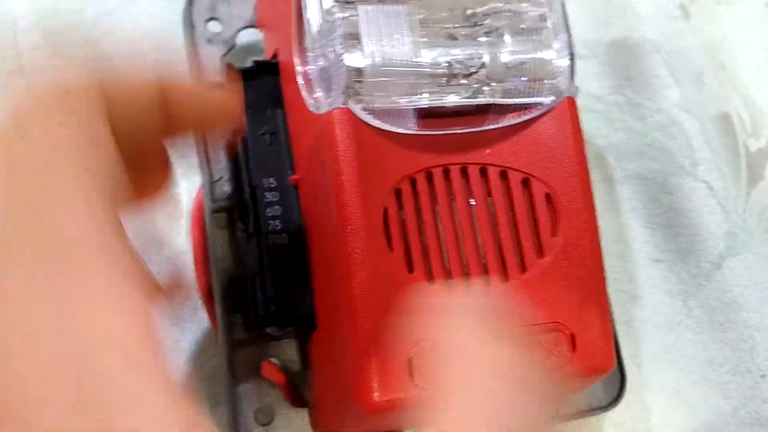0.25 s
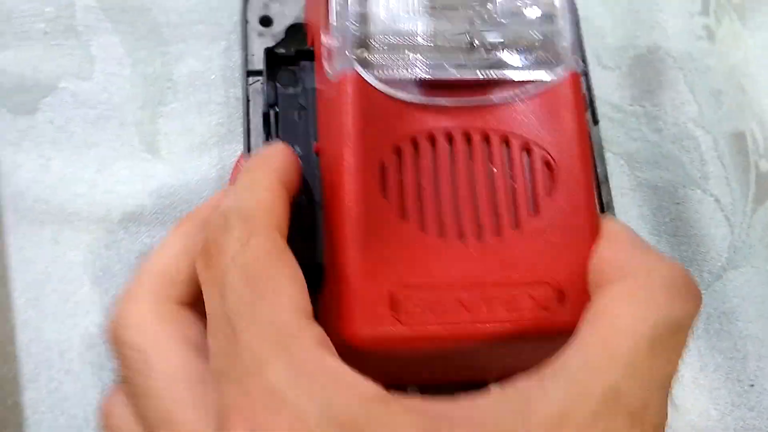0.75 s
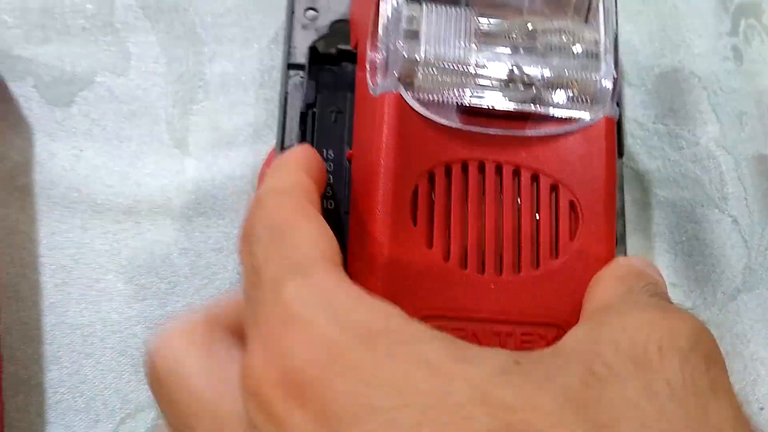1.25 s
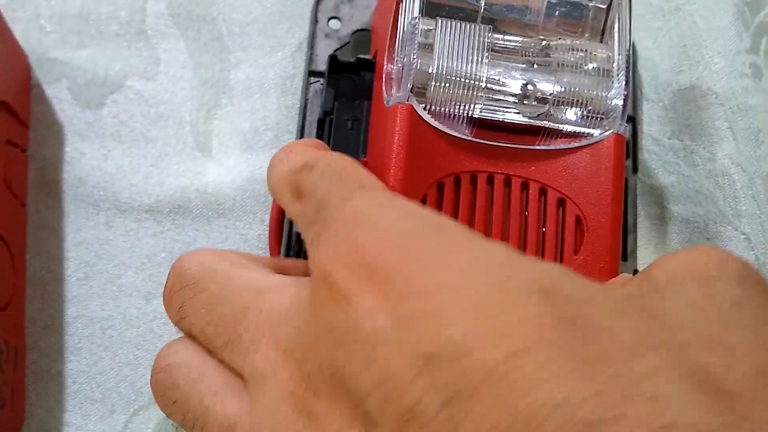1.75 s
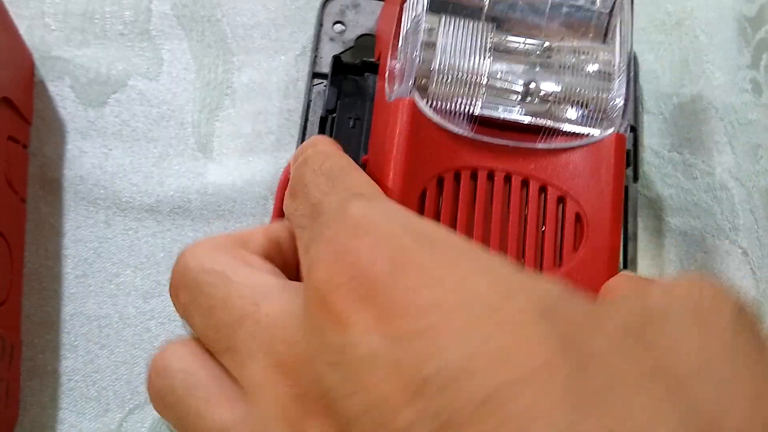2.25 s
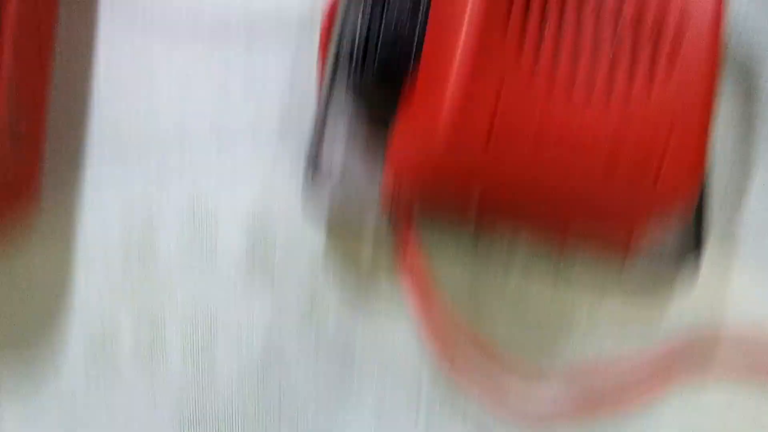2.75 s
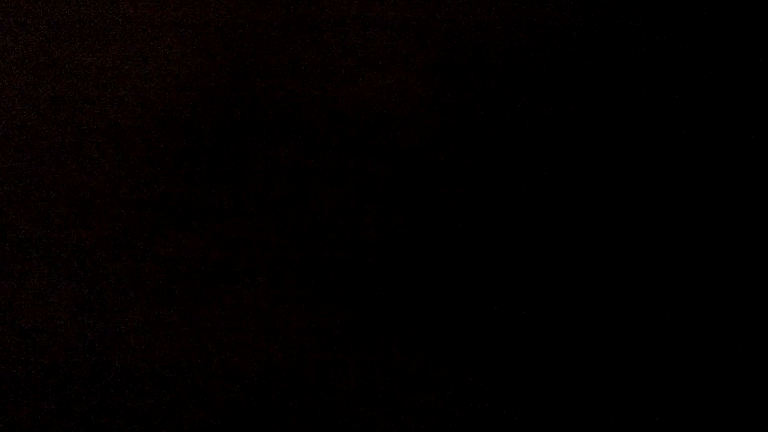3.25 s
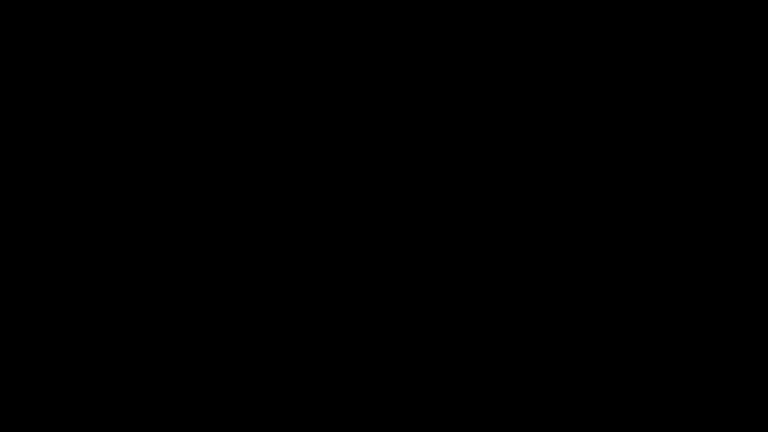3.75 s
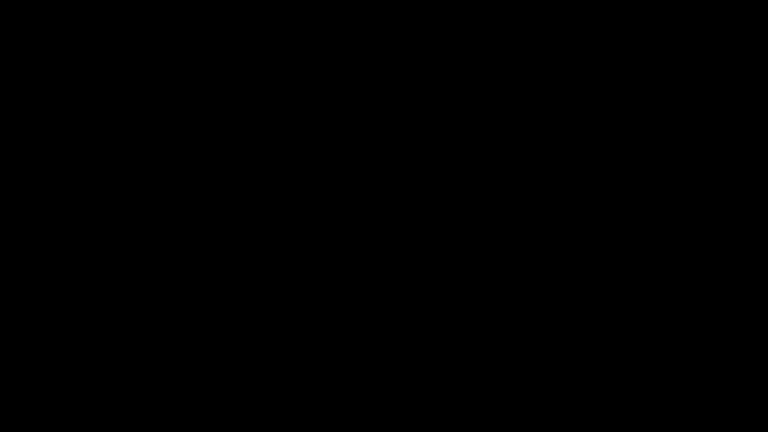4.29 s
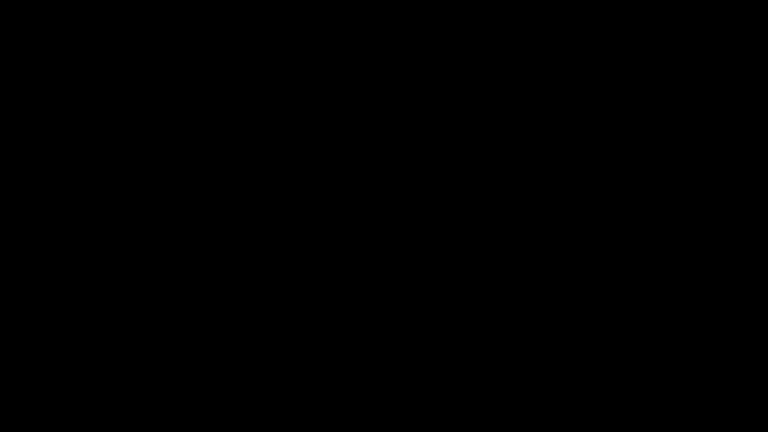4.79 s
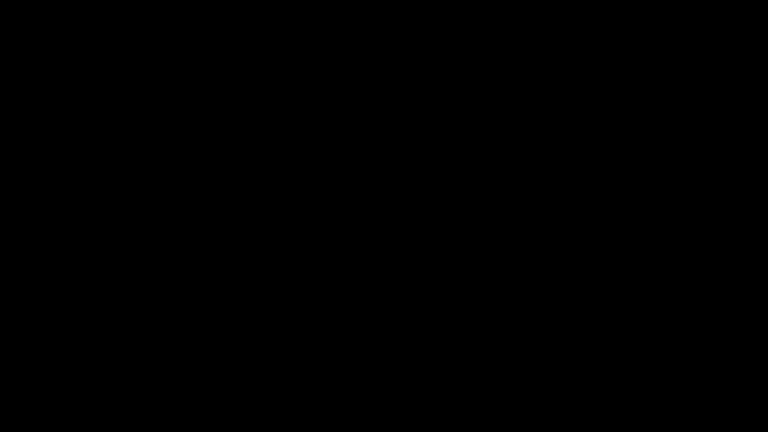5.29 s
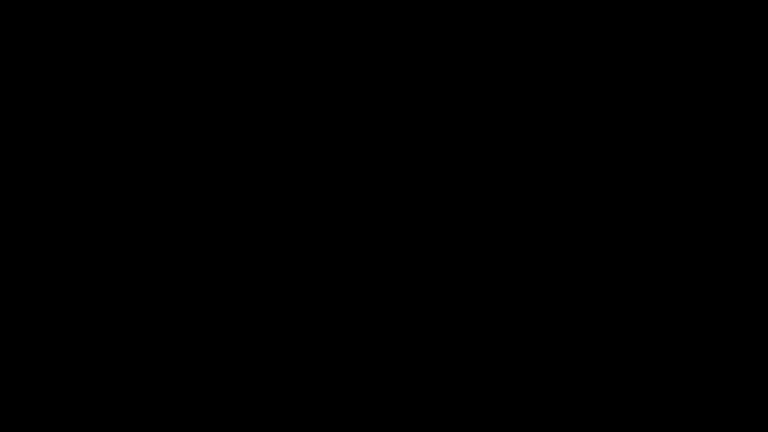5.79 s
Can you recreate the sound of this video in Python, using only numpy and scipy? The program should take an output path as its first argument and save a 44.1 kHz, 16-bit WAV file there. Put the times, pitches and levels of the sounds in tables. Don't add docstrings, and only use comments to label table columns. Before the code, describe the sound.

A close, dry stereo pickup in a quiet room with low noise and faint mains hum. From 0 to 1.9 s, fingers rub a hollow plastic housing with soft hiss, small irregular slider clicks, a faint creak around 1 s and occasional dull low bumps. A firmer hollow click comes at 2.0 s. From 2.3 s the microphone is gripped and turned: low thumps crowd the right side, with gritty catches, stronger clicks at 2.5 s and bright snaps near 2.85 s. At 3.23 s it lands with a very loud, boomy knock, and again at 3.41 s, with scraping between and a low buzz fading by 3.6 s. Then it calms: a thin low whine, light cloth drags, clicks around 3.75-4.3 s, a strong click at 4.63 s, sparse ticks near 5.4 s, and a scratchy click and hissy rub at 6.0 s.

```python
import sys
import numpy as np
from scipy import signal
from scipy.fft import rfft, irfft, next_fast_len
from scipy.io import wavfile
from scipy.ndimage import uniform_filter1d

SR = 44100
rng = np.random.default_rng(int(sys.argv[2]) if len(sys.argv) > 2 else 0)


def put_to_file(sound):
    columns = np.atleast_2d(sound).T
    safe = np.clip(columns, -1, 1)
    whole_steps = np.round(safe * 32767)
    wavfile.write(sys.argv[1], SR, whole_steps.astype(np.int16))


def undo_db(level):
    steps = np.asarray(level, float) / 20
    return 10 ** steps


N = 265834

# time in seconds, body level in dB, lean in dB, crack level in dB, body
# pitch in Hz.
SLIDER_CLICKS = [(0.0153, -56, -4, -79, 1010), (0.054, -50, 36, -65.5, 815), (0.5313, -54.5, 19, -81, 920),
                 (0.8316, -47.5, -6, -96, 650), (0.858, -56.5, 7, -67, 670), (0.9206, -58, 10, -61.5, 920),
                 (1.1325, -43, 9, -53, 950), (1.169, -46, 7, -83, 840), (1.2916, -49.5, 30, -62.5, 805),
                 (1.64, -63.5, 22, -94, 920), (1.815, -54, 15, -80, 833), (1.9418, -45.5, 12, -58, 1250),
                 (1.985, -36, 5, -47.5, 1063), (2.4785, -34.5, -5, -53, 935), (2.4941, -39, 25, -46, 1030),
                 (2.5053, -29, -15, -93, 870), (2.8138, -53, -27, -57, 1340),
                 (2.8532, -36, -24, -28.5, 1410), (2.9302, -49.5, -12, -48.5, 415),
                 (3.0675, -62.5, 6, -47, 1970), (3.2398, -33.5, -0.5, -45, 1295),
                 (3.742, -50, 20, -58.5, 1080), (3.76, -49, -2, -70, 1070), (3.8203, -46, 0, -47.5, 1420),
               (3.88, -35.5, 2, -58, 1205), (3.887, -39, 9.5, -62, 1390), (3.986, -58, -1, -73, 1720),
               (4.053, -52.5, 3, -77.5, 1510), (4.0845, -49, 9, -79.5, 630), (4.177, -49, -6, -58, 620),
               (4.273, -61, -2.5, -92, 1060), (4.634, -24, 1, -37.5, 1080), (4.6449, -36.5, -19, -48, 1350),
               (4.7647, -54.5, 8, -66.5, 1220), (4.8432, -57.5, 5, -60.5, 1330),
               (5.2658, -52.5, -8.5, -72, 487), (5.413, -43, -14, -43, 2029), (5.4162, -46, -15, -69, 1150),
               (5.4455, -56, -8, -103, 780), (5.6058, -58, -6, -66.5, 472), (5.6722, -59, 6.5, -59, 1100),
               (5.6835, -54, -18, -68, 1150), (5.838, -52, -14, -63, 1166), (5.8997, -58.5, -14, -96, 984),
               (6.0208, -35.5, 36, -37.5, 1150),
                 (0.066, -55, 12, -80, 1000), (0.191, -58.5, 11, -77, 800), (0.197, -57, -9, -78, 1190),
               (0.214, -60.5, 1, -78, 1410), (0.264, -66, -2, -82, 950), (1.157, -52.5, -1, -76, 1000),
               (1.237, -58.5, 0, -77, 1120), (1.95, -48, 8, -70, 885), (1.976, -47, 2, -56, 900),
               (1.988, -40.5, 2.5, -64, 314), (2.484, -37, 8, -62, 990), (2.514, -40, 3, -53, 1110),
               (2.8495, -42.5, -27, -49, 1090), (3.7395, -54.5, -10, -64, 353), (3.848, -73, 5, -72, 1200),
               (3.8755, -45, 18, -66, 1100), (4.6358, -33, -0.5, -35, 592), (3.356, -46, -24, -65, 1420),
               (1.8155, -56.5, 10, -87, 1020)]
# time in seconds, level in dB, pitch in Hz.
CASE_TICKS = [(0.6351, -55, 410), (0.7042, -61.5, 424), (0.769, -64, 950), (1.106, -50.5, 396),
              (1.2025, -55.5, 422), (2.2055, -57, 424), (2.3072, -55, 820), (2.3312, -52, 587),
              (2.3383, -59, 444), (2.403, -40, 520), (2.7047, -57.5, 450), (2.761, -47, 594),
              (3.369, -41, 1310), (6.0008, -41.5, 800)]
TICK_LEAN_DB, TICK_CRACK_DB = -34, -30
# pitch in Hz, width in Hz, level in dB.
HOUSING = [(620, 170, 0), (870, 188, 2.5), (1150, 340, -3.5), (1685, 130, -13.5), (2235, 84, -5.5)]
# frequency in Hz, level in dB per Hz.
CRACK = [(1800, 12.5), (3000, 9), (6000, 0.5), (12000, -6), (16000, 0)]
CRACK_HZ, LATE_CRACK_HZ = 4400, 3380
CRACK_LAG_S = .0018
NEAR_LEAN_DB, NEAR_CRACK_DB, NEAR_CRACK_HZ, NEAR_CRACK_GAIN = -22, -40, 12500, 7.5
PANEL_HZ, PANEL_WIDTH_HZ, PANEL_GAIN = 3030, 110, 2.5
# time in seconds, length in seconds,
# level in dB, lean in dB, centre in Hz.
RATTLES = [(1.121, 0.0033, -74, 6, 6000), (1.13, 0.0035, -57, 7, 5000), (1.129, .003, -61, 6, 14500),
           (2.8533, 0.0013, -23.5, -10, 13500), (4.633, 0.0048, -41.5, 2, 5503),
           (4.6336, 0.0027, -41, 3, 13500), (5.4125, 0.0031, -49.5, -1, 12000),
           (6.018, 0.01, -46.5, -5, 4500)]

# start in
# seconds, end in seconds, body level in dB, lean in dB, hiss level in dB.
FINGER_RUBS = [(0, 0.13, -71, 9, -81), (0.19, 0.26, -64, -9, -70), (0.526, 0.66, -73.5, 4, -94),
               (0.833, 0.848, -60, 2, -73.5), (0.864, 0.9, -68, 3, -73.5), (0.924, 0.93, -57.5, 8, -63.5),
               (.96, 1.044, -72, 7, -79.5), (1.112, 1.14, -58.5, -11, -70), (1.15, 1.315, -68.5, -2.5, -80),
               (1.311, 1.326, -58.5, 1, -66), (1.828, 1.85, -63.5, 8, -83), (1.948, 1.932, -53, 15, -59),
               (1.987, 1.973, -37.5, -1, -46), (2.321, 2.38, -63.5, -13, -68),
               (2.399, 2.424, -50, 1.5, -55.5), (2.432, 2.536, -53, -17, -73), (2.481, 2.498, -41, 8, -50),
               (2.516, 2.517, -41.5, 1.5, -47.5), (2.577, 2.623, -56, -23, -72),
               (2.68, 2.68, -64.5, -11, -89), (2.777, 2.845, -43, -28, -63)]
CLOTH_DRAGS = [(2.811, 2.84, -57, -31, -46.5), (2.89, 2.91, -71, -14, -71), (3.233, 3.28, -43.5, -25, -48),
               (3.281, 3.345, -57.5, -28, -62.5), (3.36, 3.381, -47.5, -25, -44),
               (3.394, 3.48, -51, -21, -46.5), (3.425, 3.36, -59, -19, -72), (3.521, 3.56, -72.5, 4, -74.5),
               (3.737, 3.79, -63, 7, -66.5), (3.758, 3.69, -45, 11, -55), (3.826, 3.95, -58, -15, -72.5),
               (3.885, 3.906, -59, 20, -62), (4.034, 4.09, -56, -4.5, -74.5), (4.14, 4.37, -64, -7, -76.5),
               (4.371, 4.41, -59, -1.5, -70.5), (4.432, 4.52, -60, -4.5, -71.5),
               (4.637, 4.654, -50, 0.5, -58), (4.68, 4.714, -60.5, -1.5, -70),
               (4.75, 4.942, -67, -7, -78.5), (4.973, 5.03, -62.5, 14, -64), (5.004, 5.22, -65, 8, -81),
               (5.218, 5.6, -69.5, 0.5, -81.5), (5.551, 5.56, -59, -14, -67.5), (5.6, 5.55, -68, -3, -76),
               (5.976, 6.12, -53.5, 20, -63.5), (6.02, 6.26, -43, -11, -36)]
# frequency in Hz, level in dB per Hz.
HISS = [(1800, 10), (2700, 3), (4000, -1.5), (6500, -10.5), (10000, -18.5), (15000, -5)]
CLOTH = [(280, 17), (450, 6), (1200, -7.5), (1800, -16.5), (2400, -19), (2600, -39)]
CLOTH_HISS = [(1800, 9), (2700, 4), (4000, -2), (6500, -7), (9000, -15.5), (12500, -7), (15000, -11.5)]
RISE_DB_PER_S, FALL_DB_PER_S, HISS_LEAN_DB = 900, 605.5, 6
STOP_DB_PER_S = 1500
HISS_TOP_HZ = 15550
TURNED_S = 2.6
LANDINGS_S = [
    3.239,
    3.417,
]
# start in seconds, end in seconds, level in dB, pitch in Hz.
CREAKS = [
    (.92, 1.095, -68, 870),
    (3.697, 3.722, -70, 1120),
    (3.801, 3.815, -64, 1140),
]
SINGS = [(3.736, 3.81, -84, 5400), (3.821, 3.853, -72, 3100), (3.821, 3.856, -80, 5700),
         (3.876, 3.894, -62.5, 2980), (4.636, 4.646, -53, 2930), (5.4135, 5.42, -62, 3280),
         (6.001, 6.016, -47.5, 1000), (5.4135, 5.42, -50.5, 1290)]
# time in seconds, level in dB, pitch in Hz.
FINGER_GRIT = [(2.395, -46, 980), (2.4025, -36, 870), (2.43, -42, 850), (2.436, -46, 900),
               (2.4415, -45, 1200), (2.4525, -51, 990), (2.4855, -30.5, 1050), (2.5195, -38, 1200),
               (2.5265, -43, 1300), (2.5315, -43, 1100), (2.539, -46, 900), (2.596, -51, 780),
               (2.615, -57, 1090)]
LIFT_GRIT = [(2.765, -44, 611), (2.779, -40, 657), (2.7865, -40, 1110), (2.794, -42, 1500),
             (2.803, -41.5, 1400), (2.82, -41, 1290), (2.828, -45, 1200)]
SLIDE_GRIT = [(3.356, -44, 1500), (3.3612, -38, 1900), (3.366, -36, 1100), (3.3705, -31.5, 1470),
              (3.3745, -31, 2000), (3.379, -36, 1810), (3.381, -41, 1200), (3.4045, -40, 2000)]
SETTLE_GRIT = [(3.752, -44, 302), (3.76, -40, 360), (3.7605, -57, 3000), (3.772, -47.5, 910),
               (3.778, -51, 400), (3.8765, -42, 1200), (3.89, -40, 1290)]
LAST_GRIT = [(6.001, -36, 910), (6.0123, -42, 1100), (6.017, -39, 705), (6.0235, -37.5, 1150),
             (6.0265, -38, 1080)]
GRIT_WIDTH, RING_WIDTH = .22, 0.27

# time in seconds, right level in dB, pitch in Hz.
GRIP_BUMPS = [(2.318, -23.5, 102), (2.335, -16, 105.5), (2.356, -18, 95), (2.386, -18.5, 117),
              (2.408, -11.5, 125), (2.445, -23.5, 102), (2.463, -16.5, 93), (2.551, -31.5, 95.6),
              (2.598, -21.5, 126), (2.625, -31.5, 114), (2.712, -33, 163), (2.746, -35, 120),
              (2.773, -29, 196), (2.785, -21, 191), (2.798, -20.5, 156), (2.807, -15, 113),
              (2.857, -25.5, 183), (2.934, -33.5, 189), (3.07, -44.5, 214)]
LONE_BUMPS = [(0.12, -34, 91), (0.365, -40, 98), (0.631, -47, 97), (0.66, -49, 103), (0.87, -51, 150),
              (1.119, -29.5, 84.6), (1.146, -39.5, 154), (1.164, -35.5, 87), (1.314, -49, 85.6),
              (3.276, -26, 122), (3.375, -19.5, 90), (3.399, -39, 163), (3.452, -21.5, 87),
              (3.494, -34.5, 93.7), (3.531, -35.5, 94.3), (3.58, -45, 93.6), (3.743, -30, 196),
              (3.762, -45, 210), (3.825, -45, 155), (4.517, -50, 113.7), (4.643, -29.5, 146),
              (4.664, -38.5, 135), (4.697, -47, 115.1), (4.777, -45, 142)]
HOUSING_BUMPS = [(1.99, -39.5, 176), (2.478, -24, 225), (2.493, -24, 185), (2.506, -29.5, 115),
                 (2.533, -31, 120), (6.004, -46, 190)]
BUMP_BASE_S, BUMP_CYCLES = 0.0034, 1.06
FAR_PORT_DB, FAR_PORT_FOLLOWS, HOUSING_LEFT_DB = -41.5, 0.47, -3.5
# time in seconds,
# contact level in dB, contact length in seconds, rocking level in dB, rocking pitch in Hz.
KNOCKS = [(3.2285, -15, .005, -40, 200), (3.2326, -1.5, .004, -6, 125), (3.2405, -1.5, .0013, -3, 430),
          (3.243, -12, .0013, -40, 200), (3.2438, -10, .0034, -40, 200), (3.2462, -12, .003, -7, 88),
          (3.2486, -16, .003, -40, 200), (3.258, -10, .005, -10, 122), (3.411, -8, .0032, -40, 200),
          (3.4128, -11, .004, -40, 200), (3.4154, -5, .0019, -40, 200), (3.4168, -15, .0011, 0, 83),
          (3.4176, -9, .005, -40, 200), (3.4218, -11, .0028, -40, 200)]
KNOCK_DIRECTIONS = [1, -1, -1, -1, -1, 1, 1, 1, -1, -1, -1, 1, 1, -1]
KNOCK_LEFT_DB, ROCKING_CYCLES = -27, 5.5
# time in seconds, level in dB, pitch in Hz.
CASE_RINGS = [(3.2352, -26.5, 1052), (3.2412, -21, 1502), (3.2445, -37, 1200), (3.258, -44.5, 898),
              (3.4112, -35, 1000), (3.4168, -26.5, 744), (3.4222, -42, 805), (3.4335, -47, 1900)]
# time in seconds, level in dB, contact in seconds.
SNAGS = [(2.3075, -36, 0.00086), (2.3326, -25.5, 0.0014), (2.3399, -33.5, 0.0011), (2.351, -34, .0012),
         (2.3735, -41, 0.00054), (2.3805, -40, .001), (2.4026, -21.5, 0.0017), (2.596, -38, .0014),
         (2.7863, -24, 0.0021), (2.815, -22, 0.00024), (2.854, -15.5, 0.00023), (2.821, -23.5, .0008),
         (2.9311, -44, .0006), (3.0684, -37, 0.00017), (3.2345, -20, 0.0009), (3.4108, -32, 0.00055)]
# time in seconds, right level in dB.
BUZZ = [(3.25, -76), (3.275, -29.5), (3.35, -27.5), (3.385, -34), (3.47, -49), (3.5, -41), (3.58, -52.5),
        (3.62, -77)]
BUZZ_LEFT_DB, BUZZ_HZ = -24, 233.4

# frequency in Hz, level in dB per Hz.
ROOM_LEFT = [(62, -83), (90, -85.5), (200, -81), (320, -91.5), (500, -103), (900, -109), (4000, -123),
             (7000, -127), (12700, -128), (13200, -150)]
ROOM_RIGHT = [(62, -83), (90, -75.5), (200, -94), (320, -105), (500, -105), (900, -108), (4000, -124),
              (7000, -128), (12700, -128), (13200, -150)]
# pitch in Hz, left level in dB, right level in dB.
HUM = [(241.5, -60, -65.5)]
# time
# in seconds, left level in dB, right level in dB.
WHINE = [(2.3, -99, -90), (2.7, -82, -64.5), (3.6, -73.5, -93.5), (6.03, -74, -88)]
WHINE_HZ = 450
CROSS_LAG, CROSS_GAIN, CROSS_SMEAR = 20, .82, .24


def rms_one(x):
    return x / np.sqrt(np.mean(x ** 2) + 1e-20)


def in_time(rows):
    s, *columns = np.transpose(rows)
    return np.array([np.interp(np.arange(N) / SR, s, c) for c in columns])


def colour(x, points):
    hz, db = np.transpose(points)
    size = next_fast_len(x.shape[-1])
    at = np.log(np.maximum(np.fft.rfftfreq(size, 1 / SR), 1))
    below = np.maximum(np.log(hz[0]) - at, 0)
    gain = undo_db(np.interp(at, np.log(hz), db) - 19 * below)
    return irfft(rfft(x, size) * gain, size)[..., :x.shape[-1]]


def resonate(x, hz, width_hz):
    r = np.exp(-np.pi * width_hz / SR)
    top = np.array([1, 0, -1]) * (1 - r * r) / 2
    return signal.lfilter(top, [1, -2 * r * np.cos(2 * np.pi * hz / SR), r * r], x)


def drift(rate):
    r = np.exp(-2 * np.pi * rate / SR)
    wander = signal.lfilter([1], [1, -2 * r, r * r], rng.standard_normal((2, N + 9000)))
    return rms_one(wander[:, 9000:])


def at_ports(alike):
    shared, *own = rng.standard_normal((3, N))
    return np.sqrt(alike) * shared + np.sqrt(1 - alike) * np.array(own)


def leaning(db, lean_db):
    return db + np.minimum([lean_db, -lean_db], 0)


def mostly_right(x, left_db):
    return x * undo_db(np.array([[left_db], [0]]))


def push(t, contact_s):
    return np.sin(np.pi * np.minimum(t / contact_s, 1)) ** 2


def add(out, s, piece):
    i = max(round(s * SR), 0)
    out[:, i:i + piece.shape[1]] += piece[:, :N - i]


def housing(x):
    return sum((-1) ** k * undo_db(db) * resonate(x, hz, wide) for k, (hz, wide, db) in enumerate(HOUSING))


def clicks(slips):
    out, t = np.zeros((2, N)), np.arange(3000) / SR
    noise = rng.standard_normal((len(slips), 3, 3000))
    contact = t / 0.0036 * np.exp(-t / 0.0018)
    contact += 0.12 * np.exp(-t / 0.0039) * np.minimum(t / .002, 1)
    snap = np.exp(-t / 0.00056) * np.minimum(t / 0.00073, 1) ** 2
    snap += 0.12 * np.exp(-t / 0.0037) * np.minimum(t / 0.0031, 1)
    soft = signal.butter(2, 2300, fs=SR, output="sos")
    for (s, body_db, lean_db, crack_db, hz), (shared, *own) in zip(slips, noise):
        landed = s >= KNOCKS[0][0]
        crack_hz = LATE_CRACK_HZ if landed else CRACK_HZ
        force = 0.36 * shared + 1.38 * np.array(own)
        ring = resonate(resonate(force * contact, hz, 220), hz, 0.47 * hz)
        body = signal.sosfilt(soft, ring + 0.31 * housing(force * contact))
        edge = colour(force, CRACK) * snap
        far = lean_db >= NEAR_LEAN_DB
        crack = (0.24 + 1.1 * far) * resonate(edge, crack_hz, 2.2 * crack_hz) + 0.64 * edge
        if landed:
            crack += PANEL_GAIN * resonate(edge, PANEL_HZ, PANEL_WIDTH_HZ)
        if not far and crack_db > NEAR_CRACK_DB:
            crack += NEAR_CRACK_GAIN * resonate(edge, NEAR_CRACK_HZ, 6000)
        crack_dbs = leaning(crack_db, np.clip(.6 * lean_db, -9, 9))
        for part, db, lag in ((body, leaning(body_db, lean_db), 0), (crack, crack_dbs, CRACK_LAG_S)):
            loudest = np.sqrt(uniform_filter1d(part ** 2, size=132).max(axis=1))
            add(out, s - .0015 + lag, part * (undo_db(db) / loudest)[:, None])
    return out


def rattles():
    out = np.zeros((2, N))
    for s, length, db, lean_db, hz in RATTLES:
        size = round(length * SR)
        chatter = rng.standard_normal((2, size))
        bright = rms_one(resonate(chatter, hz, 1.9 * hz)) * np.hanning(size)
        add(out, s, bright * undo_db(leaning(db, lean_db))[:, None])
    return out


def strokes():
    t = np.arange(N // 32 + 1) * 32 / SR
    power = np.zeros((4, len(t)))
    for start, end, db, lean_db, hiss_db in FINGER_RUBS + CLOTH_DRAGS:
        shape_db = -RISE_DB_PER_S * np.maximum(start - t, 0) - FALL_DB_PER_S * np.maximum(t - end, 0)
        if start > TURNED_S + .5:
            stop = min([s for s in LANDINGS_S if s > start] + [t[-1]])
            shape_db -= STOP_DB_PER_S * np.maximum(t - stop, 0)
        tops = np.r_[leaning(db, lean_db), leaning(hiss_db, HISS_LEAN_DB)]
        power += undo_db(tops[:, None] + np.maximum(shape_db, -200)) ** 2
    return np.array([np.interp(np.arange(N) / SR, t, row) for row in np.sqrt(power)])


def rub():
    level = strokes()
    slips = (rng.random(N) < 500 / SR) * undo_db(5.15 * np.minimum(rng.exponential(1, N), 3))
    friction = at_ports(0.095) * (1 + 0.72 * slips)
    turned = np.clip((np.arange(N) / SR - TURNED_S) / 0.018, 0, 1)
    shell = signal.sosfilt(signal.butter(2, 2200, fs=SR, output="sos"), housing(friction))
    body = (1 - .5 * turned) * rms_one(shell) + turned * rms_one(colour(friction, CLOTH))
    hiss = (1 - turned) * rms_one(colour(friction, HISS)) + turned * rms_one(colour(friction, CLOTH_HISS))
    top_band = signal.cheby2(8, 40, [12300, HISS_TOP_HZ + 200], "band", fs=SR, output="sos")
    top = signal.sosfilt(top_band, hiss)
    dull = signal.sosfilt(signal.cheby2(8, 40, 13200, fs=SR, output="sos"), hiss)
    strong = np.clip(level[2:].max(axis=0) / undo_db(-68), 0, 1) ** 4
    hiss = dull + top * strong
    body = level[:2] * body * undo_db(2.5 * drift(70)[0])
    return body + level[2:] * hiss * undo_db(1.8 * drift(70)[0])


def creaks(rows):
    out = np.zeros((2, N))
    for start, end, db, hz in rows:
        size = round((end - start) * SR)
        width = 110 + hz / 20
        friction = np.resize(rng.standard_normal(3000), size)
        panel = resonate(resonate(friction, hz, width), hz, width)
        fade = np.minimum(20 * np.hanning(size), 1)
        add(out, start, undo_db(db) * rms_one(panel) * fade * np.ones((2, 1)))
    return out


def taps(rows, lean_db, width):
    out, touch = np.zeros((2, N)), signal.unit_impulse(900)
    for (s, db, hz), sign in zip(rows, rng.choice([-1, 1], len(rows))):
        ring = resonate(resonate(touch, hz, width * hz), hz, 2 * width * hz)
        add(out, s - .0005, sign * ring / np.abs(ring).max() * undo_db(leaning(db, lean_db))[:, None])
    return out


def thumps():
    out = np.zeros((2, N))
    case = [(s, db, FAR_PORT_DB + FAR_PORT_FOLLOWS * db, hz) for s, db, hz in GRIP_BUMPS + LONE_BUMPS]
    bumps = case + [(s, db, db + HOUSING_LEFT_DB, hz) for s, db, hz in HOUSING_BUMPS]
    for (s, db, left_db, hz), turn in zip(bumps, rng.random(len(bumps))):
        length = BUMP_BASE_S + BUMP_CYCLES / hz
        rise = np.clip(length, .004, .04) * .55
        t = np.arange(int(9 * rise * SR)) / SR
        swell = (t / rise * np.exp(1 - t / rise)) ** 2
        cycles = hz * (.92 * t - .3 * rise * np.exp(-t / rise))
        swing = np.sin(2 * np.pi * (cycles + turn)) * swell
        swing += 0.15 * np.sin(2 * np.pi * 2.557 * (cycles + turn)) * swell ** 2
        swing = swing - swing.sum() * swell / swell.sum()
        add(out, s - rise, 1.58 * undo_db(np.array([[left_db], [db]])) * swing)
    return out


def knocks():
    out, t = np.zeros((2, N)), np.arange(4000) / SR
    for (s, db, contact, rock_db, hz), direction in zip(KNOCKS, KNOCK_DIRECTIONS):
        hump = push(t, contact)
        rocking = np.cos(2 * np.pi * hz * t) * undo_db(-60 * t * hz / ROCKING_CYCLES)
        kicked = np.convolve(hump / hump.sum(), rocking)[:len(t)]
        blow = undo_db(db) * hump + undo_db(rock_db) * kicked
        add(out, s, mostly_right(direction * blow, KNOCK_LEFT_DB))
    return out


def snags():
    out, t = np.zeros((2, N)), np.arange(400) / SR
    for s, db, contact in SNAGS:
        add(out, s, mostly_right(-undo_db(db) * push(t, contact), KNOCK_LEFT_DB))
    return out


def buzz():
    t = np.arange(N) / SR
    sounding = (t > BUZZ[0][0]) & (t < BUZZ[-1][0])
    tone = np.sqrt(2) * undo_db(in_time(BUZZ)) * sounding * np.sin(2 * np.pi * BUZZ_HZ * t)
    return mostly_right(tone, BUZZ_LEFT_DB)


def room():
    t = np.arange(N) / SR
    air = at_ports(0.025) * np.sqrt(SR / 2) * undo_db(0.28 * drift(2.6))
    out = np.array([colour(air[0], ROOM_LEFT), colour(air[1], ROOM_RIGHT)])
    waver = np.sqrt(2) * undo_db(.8 * drift(3))
    lag = np.array([[0], [.6]])
    for hz, *db in HUM:
        out += waver * undo_db(np.array(db)[:, None]) * np.sin(2 * np.pi * hz * t - lag)
    return out + waver * undo_db(in_time(WHINE)) * np.sin(2 * np.pi * WHINE_HZ * t - lag)


def scene():
    ticks = [(s, db, TICK_LEAN_DB, db + TICK_CRACK_DB, hz) for s, db, hz in CASE_TICKS]
    out = clicks(SLIDER_CLICKS + ticks) + rattles()
    out += rub() + creaks(CREAKS) + creaks(SINGS)
    out += taps(FINGER_GRIT, -10.5, GRIT_WIDTH)
    out += taps(LIFT_GRIT + SLIDE_GRIT, KNOCK_LEFT_DB, GRIT_WIDTH)
    out += taps(SETTLE_GRIT + LAST_GRIT, 7.2, GRIT_WIDTH)
    out += thumps() + knocks() + taps(CASE_RINGS, KNOCK_LEFT_DB, RING_WIDTH) + snags()
    return out + buzz() + room()


def band_limit(x):
    return signal.sosfilt(signal.butter(12, 16460, fs=SR, output="sos"), x)


def record(dry):
    dry = signal.sosfilt(signal.butter(2, 45, "high", fs=SR, output="sos"), dry)
    dry = signal.sosfilt(signal.cheby2(10, 50, 16300, fs=SR, output="sos"), dry)
    late = np.pad(dry[::-1], ((0, 0), (CROSS_LAG - 1, 0)))[:, :N]
    dull = signal.lfilter([CROSS_SMEAR, 1 - 2 * CROSS_SMEAR, CROSS_SMEAR], [1], late)
    wide = dry - CROSS_GAIN * dull
    return band_limit(np.clip(wide, -.99, .99))


dry = scene()
out = record(dry)
put_to_file(out)
```